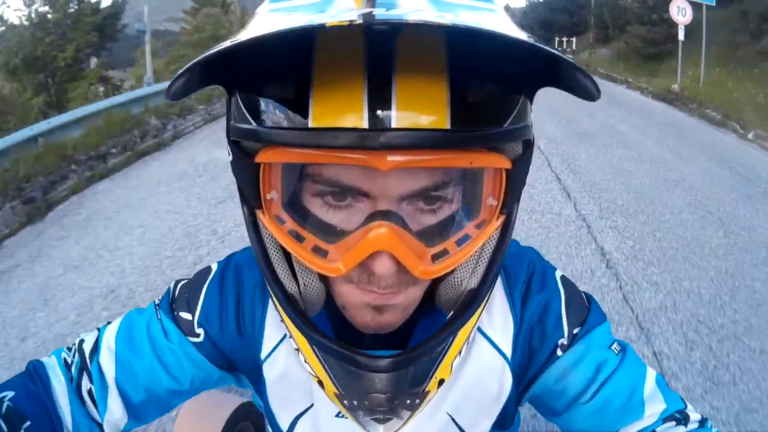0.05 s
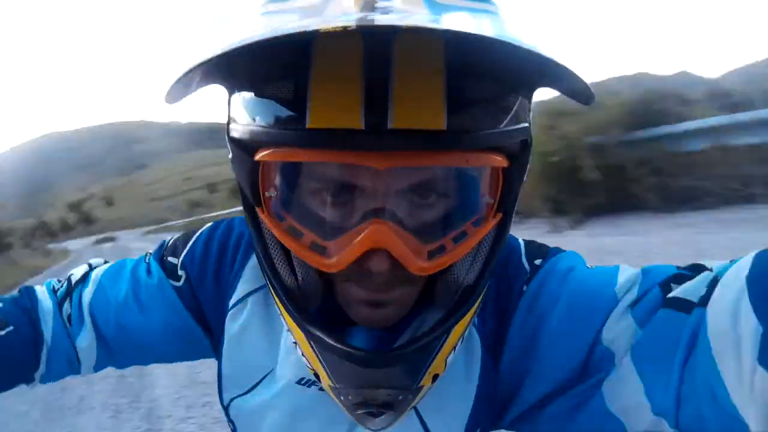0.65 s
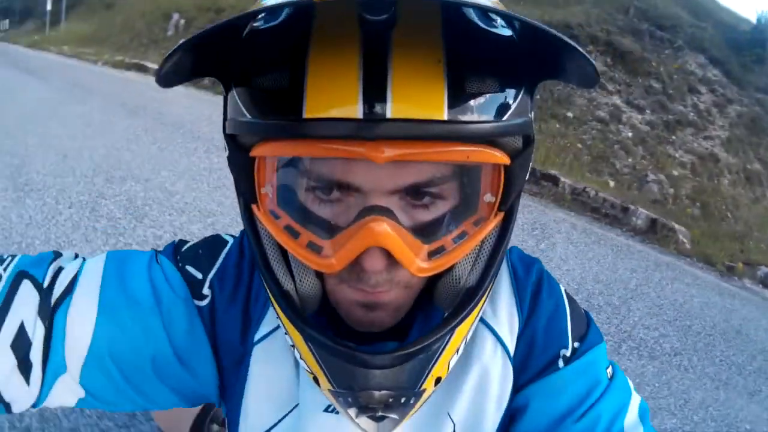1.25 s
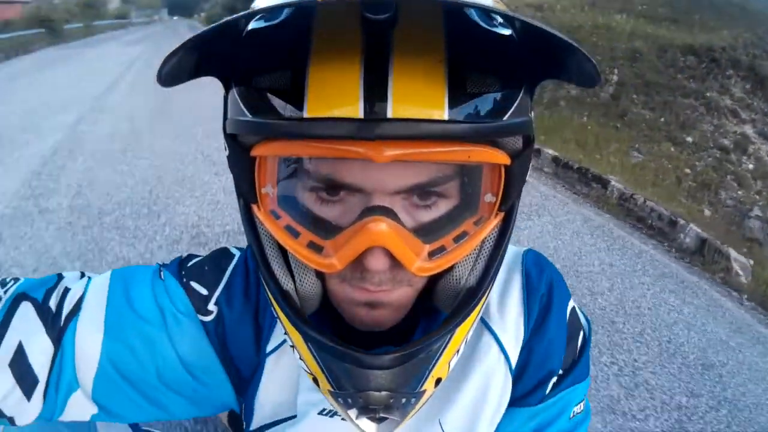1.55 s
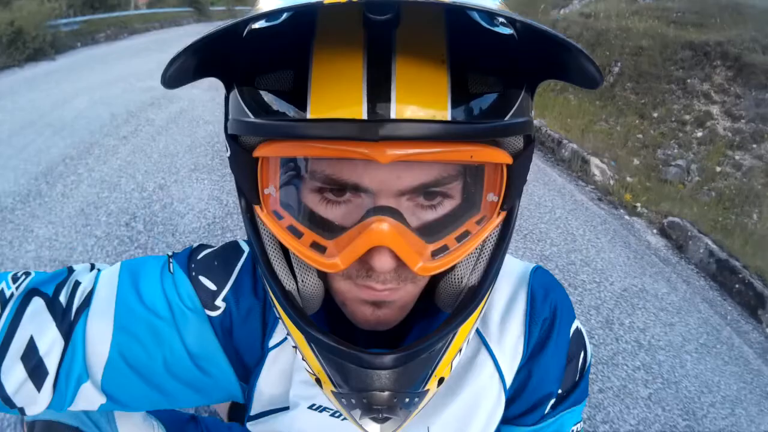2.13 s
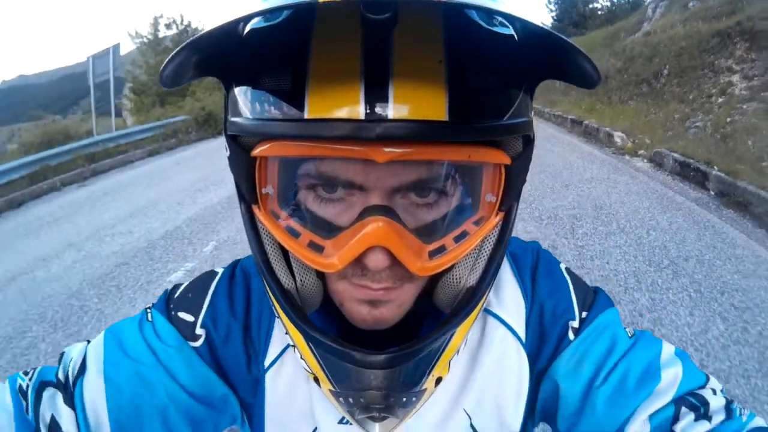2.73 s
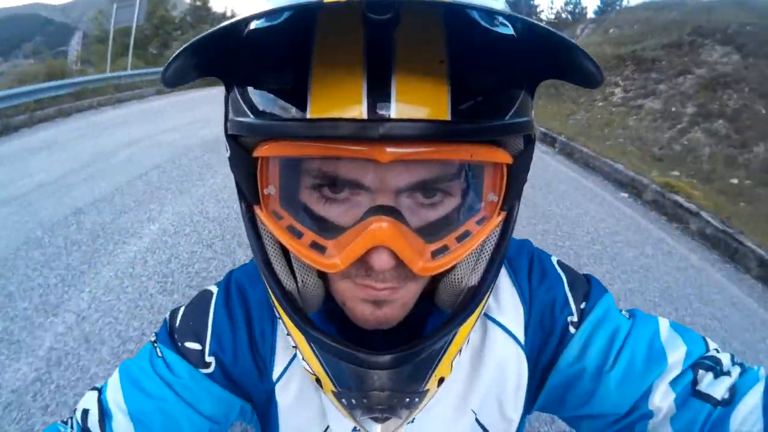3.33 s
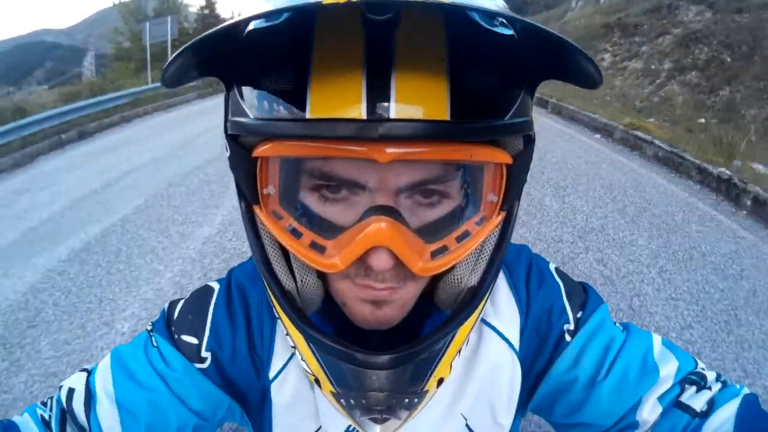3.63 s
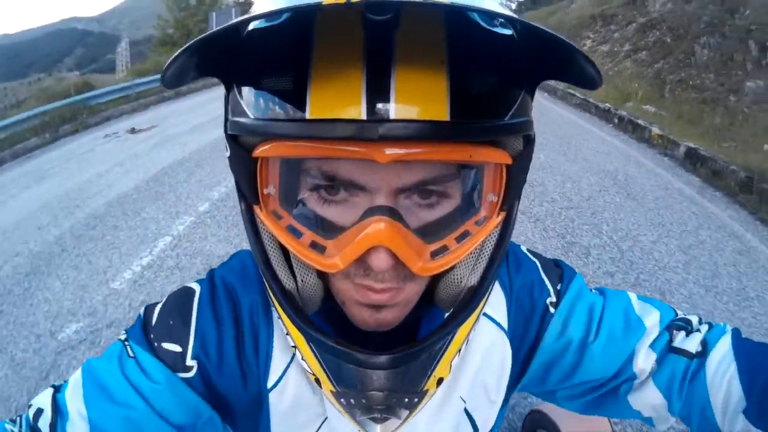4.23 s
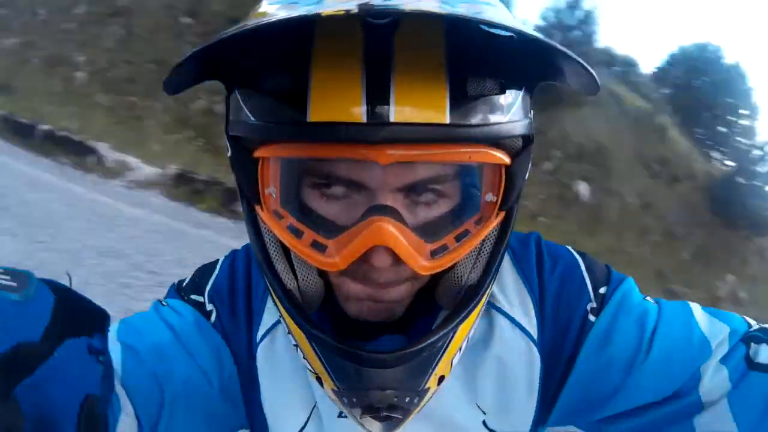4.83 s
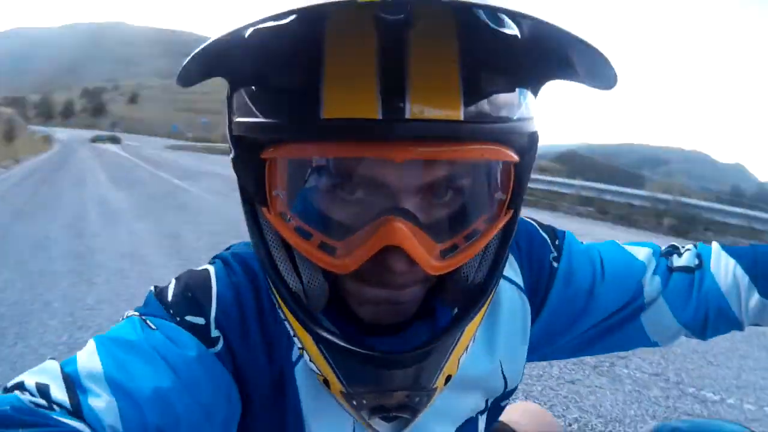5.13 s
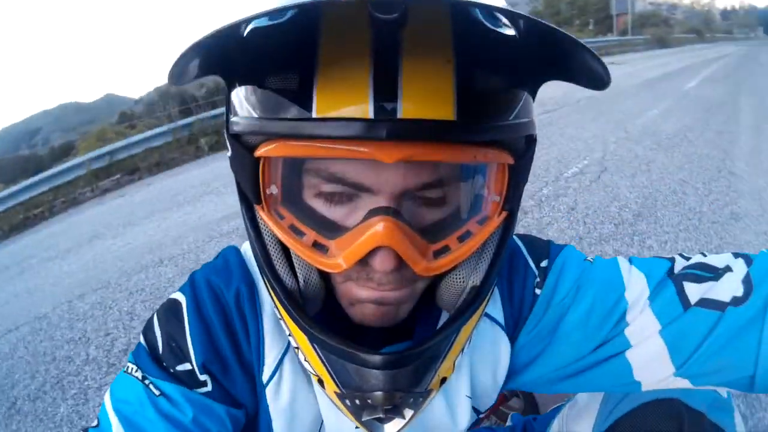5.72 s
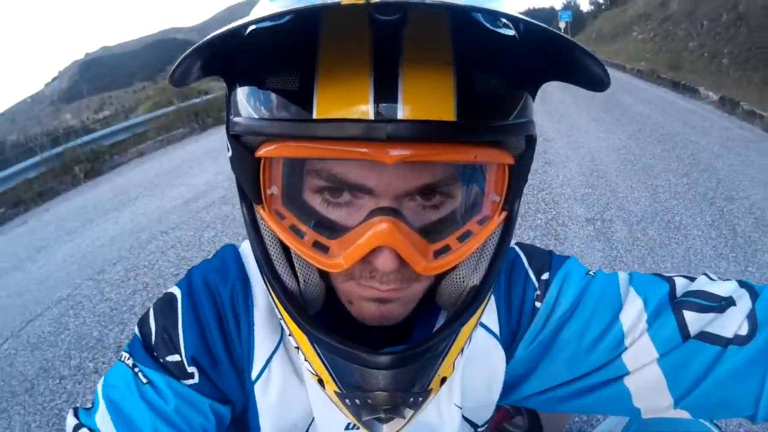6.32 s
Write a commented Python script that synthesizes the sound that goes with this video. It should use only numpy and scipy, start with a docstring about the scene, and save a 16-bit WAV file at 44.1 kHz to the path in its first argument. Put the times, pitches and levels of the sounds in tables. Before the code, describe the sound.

Heard from a microphone on the handlebar, a drift trike skids into a bend almost at once, its plastic wheels chattering, rasping and ringing on asphalt while bumps thump the mount. The ride eases into softer gritty rolling, with brief ticks and rattles. The wheels swish and howl through a second bend, chirping on stones, then die down. A little wind rumbles underneath.

```python
"""The hard plastic wheels of a drift trike ring, chatter and scrape down a mountain road.
Asphalt grain and stick-slip friction drive them; they howl and rasp as they slide through two bends.
We ride with a camera on the handlebar: bumps set its mount shuddering and thudding, the hollow
frame knocks and loose parts rattle. Behind it all sit a little wind and a faint electronic whine."""
import sys
import numpy as np
from scipy import signal
from scipy.fft import rfft, irfft, next_fast_len
from scipy.io import wavfile
from scipy.ndimage import uniform_filter1d, map_coordinates

SR = 44100
rng = np.random.default_rng(int(sys.argv[2]) if len(sys.argv) > 2 else 0)


def store_pcm(level_fs):
    """Save levels as 16-bit WAV."""
    pcm = np.round(np.clip(level_fs, -1, 1) * 32767).astype(np.int16)
    wavfile.write(sys.argv[1], SR, np.atleast_2d(pcm).T)


N = 285327
T = np.arange(N) / SR

# How hard the road loads the wheels; rides the low ring (time [s], level [dB])
WHEEL_LOAD = [(0.0, -42.5), (0.47, -32.5), (0.74, -35.5), (0.88, -26.2), (1.41, -26), (1.74, -46.0),
              (2.06, -54.5), (3.06, -49), (3.29, -58.5), (3.35, -49.3), (4.12, -38.5), (4.35, -51.0),
              (5.0, -32.5), (5.09, -35.5), (5.29, -22), (5.79, -39), (6.29, -66), (6.47, -57)]
# How fast the wheels slide sideways; rides the scrape (time [s], level [dB])
WHEEL_SLIP = [(0.0, -51), (0.41, -41.5), (0.56, -34), (0.77, -40.5), (0.94, -35), (1.15, -46),
              (1.38, -39.5), (1.62, -44.5), (2.0, -50), (2.15, -58.5), (3.29, -63.5), (3.35, -62),
              (4.15, -52.5), (4.32, -60), (4.88, -42), (5.03, -46), (5.29, -42.5), (5.62, -44.5),
              (6.47, -72)]
CRUISE_LOAD_DB, CRUISE_SLIP_DB = -40, -50
def wheels():
    """One chattering road contact drives every wheel layer; load, slip and scuffs set the balance."""
    scuff_db = scuffs()
    load_db = curves(WHEEL_LOAD)[0] + 0.74 * scuff_db
    slip_db = curves(WHEEL_SLIP)[0] + scuff_db
    extra_load_db, extra_slip_db = load_db - CRUISE_LOAD_DB, slip_db - CRUISE_SLIP_DB
    contact = stick_slip()
    return (howl(contact, load_db) + high_ring(contact, extra_load_db, extra_slip_db)
            + scrape(contact, slip_db) + slide_hiss(contact, extra_load_db, extra_slip_db)
            + grit_fizz(contact, scuff_db))


# Chatter: deep on rough asphalt and in hops, shallow in a steady slide (time [s], depth [0-1])
CHATTER_DEPTH = [(0, 0.34), (.4, 0.38), (.55, 0.86), (.8, 0.34), (1.4, 0.23), (3.25, 0.19), (3.4, 0.75),
                 (4.3, 0.35), (4.8, 0.3), (5.35, 0.17), (6.47, 0.53)]
SLIPS_PER_S, SLIP_SHARE, FLUTTER_DB = 82, .18, 5.5
def stick_slip():
    """Force at the wheel: uneven slips swell and die away over a fluttering rolling pressure."""
    depth = np.clip(curves(CHATTER_DEPTH)[0], 0, 1)
    cycles = np.cumsum(SLIPS_PER_S * (1 + 0.2153 * np.tanh(wander(55.3)))) / SR
    age = (cycles % 1) / SLIP_SHARE
    strength = evened(gain_of(4.9 * np.tanh(rng.standard_normal(N))[cycles.astype(int)]))
    power = 32 * (strength * age * np.exp(-2 * age)) ** 2 / SLIP_SHARE  # averages about 1
    flutter = evened(gain_of(FLUTTER_DB * np.sqrt(depth) * np.tanh(wander(41))))
    return np.sqrt(1 - depth + depth * power) * flutter


# Brief changes of grip (start [s], change in slip level [dB], hold [s])
GRIP_CHANGES = [(0, 4.5, 0.049), (0.42, 1, .06), (0.947, 2, 0.13), (1.255, -3, 0.023), (1.563, -0.5, 0.1),
                (1.746, 1.5, 0.29), (2.232, 6, 0.03), (2.496, 1, 0.049), (3.345, 4, 0.069),
                (4.495, 3, 0.027), (4.766, 2.5, 0.23), (4.994, 2, 0.056), (5.052, -2.5, .04),
                (5.263, 3.5, 0.068), (5.507, 2, 0.097), (5.7, -2.5, .03), (5.78, 3, 0.017),
                (6.002, 3, 0.14)]
SCUFF_ATTACK_S, SCUFF_RELEASE_S = 0.0016, 0.005
def scuffs():
    """Level ride in dB: a scuff drags the wheels harder, a skip unloads them."""
    ride_db = np.zeros(N)
    for s, db, hold in GRIP_CHANGES:
        attack = np.clip((T - s) / SCUFF_ATTACK_S, 0, 1)
        ride_db += db * attack * np.exp(-np.maximum(T - s - hold, 0) / SCUFF_RELEASE_S)
    return ride_db


# Low wheel modes, and the modes of a sideways slide (pitch [Hz], width [Hz], relative level [dB])
LOW_MODES = [(1475.4, 109, 0.5), (1440, 250, -3), (1624, 28, -7)]
SLIDE_MODES = [(582, 78, 4), (275, 54, 0), (3940, 155, 5)]
# Pitch bend, taken relative to its mean; sags out of each bend (time [s], pitch [Hz])
HOWL_BEND = [(0, 1472), (.8, 1515), (1.2, 1436), (1.8, 1476), (4.9, 1486), (5.3, 1506), (5.42, 1446),
             (6.47, 1485)]
def howl(contact, load_db):
    """Asphalt grain rings the low wheel modes, louder under load, with the slide modes tucked under."""
    hz, = curves(HOWL_BEND)
    playhead = np.cumsum(hz / hz.mean())
    low = saturate(ring(contact * grit(2.3), LOW_MODES))
    bent = map_coordinates(low, [playhead], order=3, mode="mirror")
    slide = ring(contact * grit(2.5), SLIDE_MODES)
    return gain_of(load_db - 0.94) * bent + gain_of(load_db - 20) * slide


# High wheel modes and frame modes (pitch [Hz], width [Hz], relative level [dB])
HIGH_MODES = [(1822, 156, 20), (1974, 140, -28)]
FRAME_MODES = [(657, 60, -1.5), (554, 254, -2.5), (407.7, 180, -5.5), (952, 92, -6), (168, 660, -11)]
# Extra push on the high ring (time [s], boost [dB])
HIGH_BOOST = [(0, 10), (.12, 0), (.68, 5), (1.02, 1.5), (1.2, -6), (2.2, -2), (3.4, 3), (3.9, 8.5),
              (4.35, 4), (4.8, 3.5), (5.3, -4.5), (6.47, 0)]
def high_ring(contact, extra_load_db, extra_slip_db):
    """Load and slip both bring up the high wheel modes; the frame rings along underneath."""
    high_db = -45.5 + 0.39 * extra_load_db + 0.5 * extra_slip_db + curves(HIGH_BOOST)[0]
    high = gain_of(high_db) * ring(contact * grit(3.6), HIGH_MODES)
    frame = gain_of(-55 + 0.63 * (high_db + 44)) * ring(contact * grit(4.9), FRAME_MODES)
    return high + frame


# Upper modes of the scraped plastic (pitch [Hz], width [Hz], relative level [dB])
PLASTIC_MODES = [(2278, 31, -10), (2680, 140, -2), (3130, 96, -5), (3530, 71, -3), (3877, 166, 4),
                 (4050, 230, -3.5), (4604, 210, -2.5), (4840, 69, -9)]
# EQ of the scrape (frequency [Hz], gain [dB])
SCRAPE_EQ = [(60, -26), (200, -1.5), (580, -8), (800, 1), (1100, -0.5), (1300, 1.5), (2100, 3.5), (2400, 2),
             (2800, 4), (3200, 1), (4100, 1.5), (4700, -14.5), (5600, -34.5)]
def scrape(contact, slip_db):
    """Plastic drags across asphalt: broad friction noise with a ringing edge."""
    scrape_db = slip_db - 7 * hopping(T)  # a hopping wheel spends less time scraping
    edge = gain_of(scrape_db - 4.5) * ring(contact * grit(5.4), PLASTIC_MODES)
    body = gain_of(scrape_db - 0.55) * evened(colour(contact * grit(5.5), SCRAPE_EQ))
    return edge + body


# EQ of the hiss (frequency [Hz], gain [dB])
HISS_EQ = [(3000, -13), (4800, -1.5), (5300, 3), (5850, 3), (6500, -5), (7200, -0.5), (7600, -6.5),
           (8100, -3), (8900, -13), (12000, -12), (15500, -20)]
def slide_hiss(contact, extra_load_db, extra_slip_db):
    """Bright friction hiss opens up with slip and ducks under load."""
    hiss_db = -61 - 0.3 * extra_load_db + 1.12 * extra_slip_db
    return gain_of(hiss_db) * evened(colour(np.sqrt(contact) * grit(5.1), HISS_EQ))


# EQ of the fizz (frequency [Hz], gain [dB])
FIZZ_EQ = [(5000, -10), (8700, -4), (9600, 2.5), (10300, 0.5), (11200, 2), (12000, -4), (13000, 0.5),
           (15500, -8)]
# Fader ride of the fizz (time [s], level [dB])
FIZZ_RIDE = [(0, -64), (.6, -60.5), (1.25, -70), (1.5, -61.5), (2.15, -80), (2.3, -66), (3.1, -69),
             (3.45, -78), (4, -59.5), (4.45, -69.5), (4.85, -62.5), (5.6, -62.5), (6.1, -67.5), (6.47, -88)]
def grit_fizz(contact, scuff_db):
    """Fine grit under the wheels adds a fizzy top end that jumps with each scuff."""
    fizz_db = curves(FIZZ_RIDE)[0] + .6 * scuff_db - 1
    return gain_of(fizz_db) * evened(colour(np.sqrt(contact) * grit(4.9), FIZZ_EQ))


# Sweep into the second slide (time [s], centre [Hz], level [dB])
SWISH_SWEEP = [(4.6, 4540, -56), (4.71, 4350, -53), (4.77, 3990, -44.5), (4.82, 3210, -47),
               (4.88, 2880, -48), (4.94, 2935, -50), (5.02, 2830, -67)]
def swish():
    """A band of friction noise falls in pitch as the wheel turns sideways."""
    hz, db = curves(SWISH_SWEEP)
    phase = 2 * np.pi * np.cumsum(hz) / SR
    band = wander(540) * np.cos(phase) + wander(600) * np.sin(phase)
    return gain_of(db) * band * (T > SWISH_SWEEP[0][0]) * (T < SWISH_SWEEP[-1][0])


# Single grabs of a skidding wheel (time [s], peak [dB])
SKID_GRABS = [(0.82, -17.5), (0.9128, -20), (0.956, -18.5), (1.038, -23), (5.926, -34.5)]
# EQ of a hop or grab (frequency [Hz], gain [dB])
RASP_EQ = [(500, -13), (1200, 8), (1780, 15.5), (2300, 5.5), (2750, 14), (3300, 4), (4000, 20.5), (4600, 2),
           (5200, 2.5), (6300, -3), (7300, -15), (8600, -8), (12000, -34), (15500, -29.5)]
HOP_START_S, HOPS_PER_S, HOP_COUNT, HOP_PEAK_DB, HOP_FADE_DB = .4535, 69, 16, -19, 9.5
def judders():
    """The sliding wheel grabs the road in rasps: a run of hops into the first bend, then single grabs."""
    hop_times = HOP_START_S + np.arange(HOP_COUNT) / HOPS_PER_S
    hops = [(s, HOP_PEAK_DB - HOP_FADE_DB * (1 - hopping(s))) for s in hop_times]
    hits = [(s, db, 0) for s, db in hops + SKID_GRABS]
    return bursts(hits, RASP_EQ, attack_s=0.0048, decay_s=0.0039, patchy_db=4.0)


def hopping(s):
    """How hard the wheel hops at time s: an arch from 0 to 1 and back."""
    return np.sin(np.pi * np.clip((s - HOP_START_S) * HOPS_PER_S / (HOP_COUNT - 1), 0, 1))


# Featured snags on stones (time [s], peak [dB], pitch [Hz])
STONE_SNAGS = [(0.3014, -31, 1460), (0.431, -19.5, 1553), (0.481, -21, 1404), (.6429, -12, 1795),
               (0.6532, -13, 1762), (0.913, -19, 1424), (1.0092, -20, 1360), (1.5503, -26, 1586),
               (2.233, -40, 1470), (2.47, -27.5, 1464), (3.3457, -40, 1420), (3.5266, -45, 1480),
               (3.9292, -27.5, 1772), (4.0812, -33, 1830), (4.3246, -37, 1480), (4.632, -32.5, 1890),
               (4.908, -19.5, 1457), (5.041, -33, 1470), (5.2995, -13, 1510), (5.3222, -20, 1503),
               (5.3887, -30, 1390), (5.4172, -17, 1470), (5.444, -13, 1470), (5.7368, -30, 1530),
               (5.754, -20, 1470), (5.823, -26, 1494)]
STONE_ABOVE_LOAD_DB, STONE_SPREAD_DB, STONE_HZ = 9.5, 1, 1480
def snags():
    """A stone catches a wheel and leaves a short chirp; small ones come at random, louder under load."""
    out, t = np.zeros(N), np.arange(SR // 16) / SR
    stones = []
    for s, chance in scattered(per_s=5):
        load_db = np.interp(s, *np.transpose(WHEEL_LOAD))
        stones.append((s, load_db + STONE_ABOVE_LOAD_DB + STONE_SPREAD_DB * chance, STONE_HZ))
    for s, db, hz in STONE_SNAGS + stones:
        chirp = (1 - np.exp(-t / 0.00081)) * np.exp(-t / 0.0069) * np.sin(2 * np.pi * hz * t)
        add(out, s, peaked(chirp, db))
    return out


# Bumps that shake the mount (time [s], level [dB], pitch [Hz], time until its joint grips [s])
ROAD_BUMPS = [(0.026, -14.5, 74.6, 0.087), (0.144, -15, 71, .048), (0.214, -12, 73, 0.078),
              (0.773, -12.5, 74, 0.069), (0.873, -11, 81, 0.087), (1.034, -8.5, 62, .053),
              (1.084, -11, 70, 0.074), (1.195, -17.5, 71.6, .27), (1.501, -29, 70, 0.13),
              (1.671, -21, 68.5, 0.15), (1.827, -28, 72.2, 0.17), (2.253, -28.5, 72, .14),
              (2.446, -22.5, 71, 0.081), (2.527, -25, 72, 0.11), (2.68, -23.5, 70.8, 0.13),
              (2.834, -15, 71.6, .43), (3.638, -27, 71, 0.15), (3.796, -17, 70, .13),
              (3.951, -24.5, 69, 0.046), (4.019, -26, 71, 0.095), (4.128, -27.5, 72.5, .3),
              (5.424, -21, 72.3, 0.19), (5.862, -18.5, 73.3, .072), (5.941, -23, 73.6, .3)]
SHUDDER_T60_S = 0.7
def shudder():
    """Each bump jerks the springy mount; it swings unevenly until friction holds it."""
    out, jostle, looseness = np.zeros(N), wander(21.3), wander(23)
    for s, db, hz, length in ROAD_BUMPS:
        t = np.arange(int(length * SR)) / SR
        here = slice(int(s * SR), int(s * SR) + len(t))
        swing = gain_of(db - 60 * t / SHUDDER_T60_S + 1.26 * np.tanh(jostle[here]))
        swing *= np.clip((t[-1] - t) / 0.0093, 0, 1)  # the joint grips
        swing *= 1 - .5 * np.exp(-t / 0.0047)
        phase = 2 * np.pi * hz * t + 1.1 + 0.26 * (jostle[here] - jostle[here][0])
        joint_play = (0.81 + 0.5 * looseness[here]) * np.cos(2 * phase) + 0.13 * np.sin(3 * phase)
        attack_s = 0.00089 * gain_of(-.5 * (db + 10.5))  # hard bumps strike faster
        jerk = 1 - np.exp(-(t / attack_s) ** 2)
        add(out, s, -swing * jerk * (np.sin(phase) + (swing + 0.017) * joint_play))
    return out


def buzz(swing):
    """While the mount swings, its joints chafe and ring the frame, 32 dB under the swing."""
    envelope = np.sqrt(abs(uniform_filter1d(swing ** 2, size=300)))
    return gain_of(-32) * envelope * ring(grit(4.9), FRAME_MODES)


def tremble():
    """The rough road keeps the mount faintly humming."""
    return gain_of(-53 + 2 * wander(1)) * ring(rng.standard_normal(N), [(70, 25.5, 0)])


# The mount hits its stop (time [s], peak [dB], blows [count])
STOP_HITS = [(.026, -21.5, 1), (.215, -20.5, 1), (.773, -17, 1), (.873, -8.5, 1), (.912, -11, 1),
             (.944, -9.5, 1), (1.01, -16, 1), (1.033, -6, 4), (1.191, -25, 1), (2.83, -31.5, 1),
             (3.796, -32, 1)]
# EQ of a thud (frequency [Hz], gain [dB])
THUD_EQ = [(60, 3), (130, 16.5), (235, 0.5), (340, -1), (470, 1), (650, 2), (800, -11.5), (970, -7),
           (1200, -4.5), (1480, 7.5), (2200, -15), (5000, -53)]
def thuds():
    """A hard swing ends against the stop: one dull push with a little chatter."""
    out, t = np.zeros(N), np.arange(SR // 12) / SR
    for s, db in rebounds(STOP_HITS):
        chatter = 0.081 * rng.standard_normal(len(t)) * np.exp(-t / 0.012)
        push = t == 0
        add(out, s, peaked(colour(chatter - push, THUD_EQ), db))
    return out


# Blows to the frame (time [s], peak [dB], blows [count])
FRAME_HITS = [(.844, -22, 1), (.944, -23, 2), (1.042, -23.5, 3), (1.321, -32, 1), (2.47, -30.5, 1),
              (2.514, -38.5, 1), (4.803, -19.5, 1), (4.856, -28.5, 1), (6.337, -36, 1), (6.366, -42.5, 1)]
# Body of a knock (pitch [Hz], relative level [dB], time to fall 60 dB [s])
HOLLOW_MODES = [(341, -2, 0.029), (460, -19, 0.014), (546, -5, 0.032), (633, -2.5, 0.068),
                (980, -11, 0.016), (1470, -7, 0.046)]
def knocks():
    """Blows ring the low modes of the hollow frame."""
    out, t = np.zeros(N), np.arange(SR // 8) / SR
    for s, db in rebounds(FRAME_HITS):
        blow = sum(gain_of(level - 60 * t / t60) * np.sin(2 * np.pi * (hz * t + rng.random()))
                   for hz, level, t60 in HOLLOW_MODES)
        blow *= 1 - np.exp(-t / 0.00033)
        add(out, s, peaked(blow, db))
    return out


REBOUND_S, REBOUND_LOSS_DB = .0185, 3.4
def rebounds(hits):
    """A hard blow repeats, weaker with each swing of the mount: (time [s], peak [dB])."""
    return [(s + k * REBOUND_S, db - k * REBOUND_LOSS_DB)
            for s, db, blows in hits for k in range(round(blows))]


# Featured ticks of loose parts (time [s], peak [dB], treble tilt [dB])
SHARP_TICKS = [(.0197, -32, 1), (.0655, -25, -3), (.2458, -25.5, -2), (.2744, -26.5, 1), (.4913, -20.5, 2),
               (.51, -23, 2), (.555, -33, -6), (.6444, -26, 2), (.666, -22, -1), (.9093, -35, 12),
               (.9565, -20, -1), (.9787, -27, 6), (1.0056, -27.5, 5), (1.1977, -35, 4), (1.3524, -33, 14),
               (1.4107, -38, 13), (2.2348, -36, -9), (2.5102, -36, -6), (2.616, -38, 1), (3.5443, -41.5, 2),
               (3.595, -39, 4), (3.6102, -30.5, -4), (3.638, -38, 2.5), (3.7482, -33, 1),
               (3.8759, -39, -11), (3.9522, -32, 4), (3.9955, -26.5, 3), (4.022, -31, 3), (4.0407, -37, 1),
               (4.1305, -29.5, 1), (4.1446, -28, 3), (4.3959, -37, 2), (4.2028, -35, 9), (4.6311, -38, 11),
               (5.0317, -40, 2.5)]
# Rattling on rough asphalt (start [s], length [s], typical peak [dB], treble tilt [dB])
RATTLE_SPELLS = [(0, .45, -38, 2), (.45, .22, -26.5, -1), (1.021, .2, -40.5, 7), (1.363, .07, -41, 10),
                 (3.79, .15, -34.5, 1), (3.94, .27, -35.5, 2)]
# EQ of a tick (frequency [Hz], gain [dB])
TICK_EQ = [(300, -42), (1200, -9), (1750, 35.5), (2200, 9), (3900, 15), (5000, 6), (5900, 10), (7200, 5),
           (8800, -5), (9700, 1.5), (10400, -4.5), (11300, 2.5), (13200, -18), (15500, -27)]
RATTLE_SPREAD_DB = 1.5
def ticks():
    """Loose plastic parts touch in brief bright bursts, singly or in spells of rattling."""
    rattling = [(s, db + RATTLE_SPREAD_DB * chance, tilt_db) for s, chance in scattered(per_s=55)
                for start, length, db, tilt_db in RATTLE_SPELLS if start <= s < start + length]
    return bursts(SHARP_TICKS + rattling, TICK_EQ, attack_s=0.000093, decay_s=0.0028, patchy_db=3.5)


# Fader ride of the wind (time [s], level [dB])
GUST_RIDE = [(0, -36.5), (.85, -35.5), (.99, -20.5), (1.1, -37), (2.1, -52), (2.85, -40.5), (3.3, -48),
             (3.95, -39.5), (4.5, -42.5), (5.05, -40.5), (5.35, -43.5), (5.9, -38), (6.47, -57)]
# EQ of the wind rumble (frequency [Hz], gain [dB])
WIND_EQ = [(6, -40), (22, 5.5), (42, -8), (65, -2), (100, -26.5), (200, -29.5), (500, -26.5), (1500, -91)]
def wind():
    """Lumpy air pressure buffets the camera housing."""
    gust_db = curves(GUST_RIDE)[0] + 0.86 * wander(2.6)
    rumble = evened(colour(rng.standard_normal(N), WIND_EQ))
    return gain_of(gust_db) * evened(np.tanh(0.28 * rumble))


def electronics():
    """Faint camera hiss, a thin steady whine, and a higher whine and fizz that return every second."""
    cycle = (T - .115) % 1
    whine = (np.sin(2 * np.pi * 13388 * T) + .55 * np.sin(2 * np.pi * 14093 * T)) * (cycle < .15)
    fizz_gate = (abs(cycle - .17) < .035) | (abs(T - 2.38) < .2)  # plus one longer spell
    fizz = ring(rng.standard_normal(N), [(13400, 1400, 0)]) * fizz_gate
    steady = gain_of(-79) * np.sin(2 * np.pi * 9555 * T)
    steady += gain_of(-78.5) * ring(rng.standard_normal(N), [(9485, 30, 0)])
    hiss = gain_of(-70) * rng.standard_normal(N)
    return gain_of(-69) * whine + gain_of(-68) * fizz + steady + hiss


def bursts(hits, eq, attack_s, decay_s, patchy_db):
    """Short bursts of contact noise; each strikes another spot and so has its own colour."""
    out, t = np.zeros(N), np.arange(SR // 30) / SR
    hz, level = np.transpose(eq)
    bands = np.linspace(hz[0], hz[-1], 50)
    tilt = np.clip((bands - 7000) / 4000, -1, 1)
    for s, db, tilt_db in hits:
        tint = np.interp(bands, hz, level) + tilt_db * tilt + patchy_db * rng.standard_normal(len(bands))
        noise = rng.standard_normal(len(t)) * (1 - np.exp(-t / attack_s)) * np.exp(-t / decay_s)
        add(out, s, peaked(colour(noise, np.c_[bands, tint]), db))
    return out


def grit(grain_db):
    """Countless tiny stone contacts of unequal but limited size."""
    return evened(rng.standard_normal(N) * gain_of(grain_db * np.tanh(wander(750))))


def ring(x, modes):
    """Steep-sided resonances (pitch [Hz], width [Hz], relative level [dB]), scaled to rms 1."""
    out = np.zeros(N)
    for hz, width, db in modes:
        b, a = signal.iirpeak(hz, hz / width, fs=SR)
        out += gain_of(db) * evened(signal.lfilter(b, a, signal.lfilter(b, a, x)))
    return evened(out)


def saturate(x):
    """Friction limits how far a wheel mode can swing."""
    analytic = signal.hilbert(x, next_fast_len(N))[:N]
    return evened((analytic / np.sqrt(1 + 0.058 * abs(analytic) ** 2)).real)


def colour(x, eq):
    """Minimum-phase EQ through the points (frequency [Hz], gain [dB])."""
    hz, db = np.transpose(eq)
    f = abs(np.fft.fftfreq(8192, 1 / SR))
    log_gain = np.log(gain_of(np.interp(np.log(f + 1), np.log(hz), db)))
    taps = np.fft.ifft(np.exp(np.conj(signal.hilbert(log_gain)))).real
    return signal.oaconvolve(x, taps[:len(f) // 2])[:len(x)]


def wander(hz):
    """Smooth random modulation of rms 1, rolling off around hz."""
    size = next_fast_len(N)
    f = np.fft.rfftfreq(size, 1 / SR)
    return evened(irfft(rfft(rng.standard_normal(size)) * np.exp(-(f / hz) ** 2), size)[:N])


def scattered(per_s):
    """Irregular triggers (time [s], random strength [-2 to 2])."""
    slots = np.arange(per_s * N // SR)
    times = (slots + rng.random(len(slots))) / per_s
    return zip(times, np.clip(rng.standard_normal(len(slots)), -2, 2))


def curves(rows):
    """The columns of a table as automation lanes: straight lines in time."""
    s, *columns = np.transpose(rows)
    return [np.interp(T, s, c) for c in columns]


def gain_of(db):
    """Decibels to amplitude."""
    return 10 ** (np.asarray(db) / 20)


def evened(x):
    """Scales to rms 1."""
    return x / np.sqrt(np.mean(x ** 2) + 1e-20)


def peaked(x, db):
    """Scales to a peak of db."""
    return gain_of(db) * x / abs(x).max()


def add(mix, s, sound):
    """Mixes a sound in at time s."""
    part = mix[max(round(s * SR), 0):][:len(sound)]
    part += sound[:len(part)]


def scene():
    """Wheels, trike and background meet in mono at the handlebar."""
    background = wind() + electronics()
    road = wheels() + swish() + judders() + snags()
    swing = shudder()
    trike = swing + buzz(swing) + tremble() + thuds() + knocks() + ticks()
    return (road + trike + background)[None]


HIGH_CUT_HZ = 15800
def record(dry):
    """The camera's band limit: a steep high cut."""
    taps = signal.firwin(511, HIGH_CUT_HZ, window=("kaiser", 9), fs=SR)
    return signal.oaconvolve(dry, taps[None], "same")


dry = scene()
out = record(dry)
store_pcm(out)
```